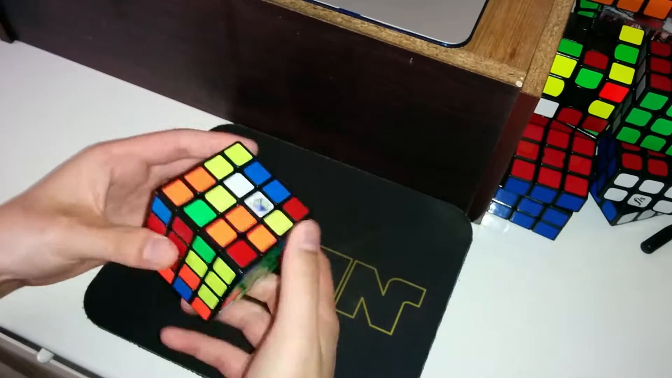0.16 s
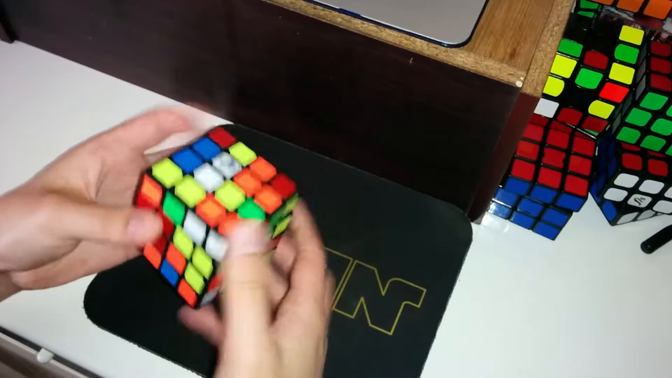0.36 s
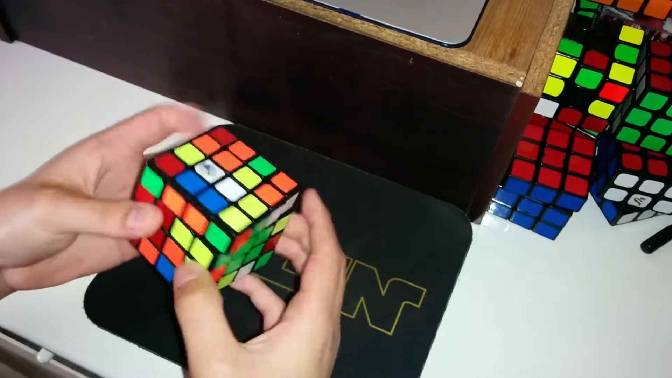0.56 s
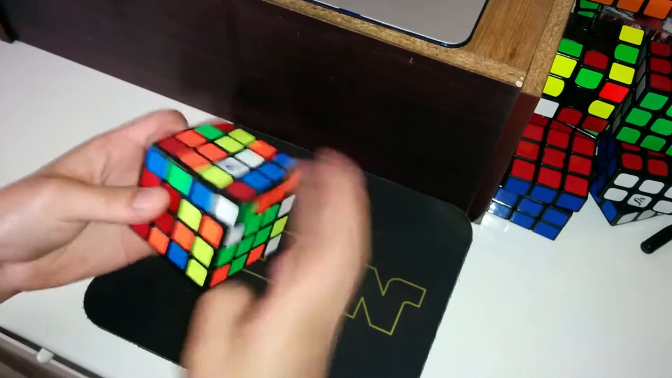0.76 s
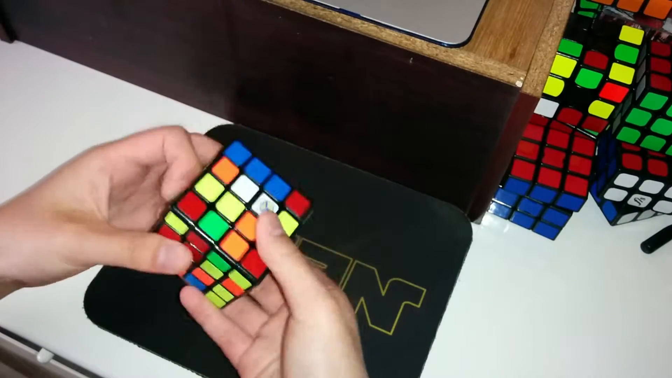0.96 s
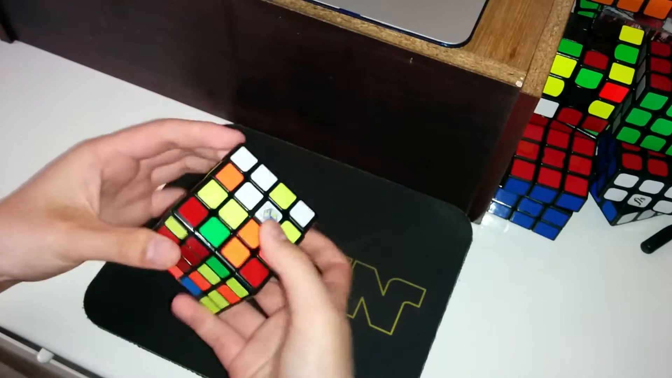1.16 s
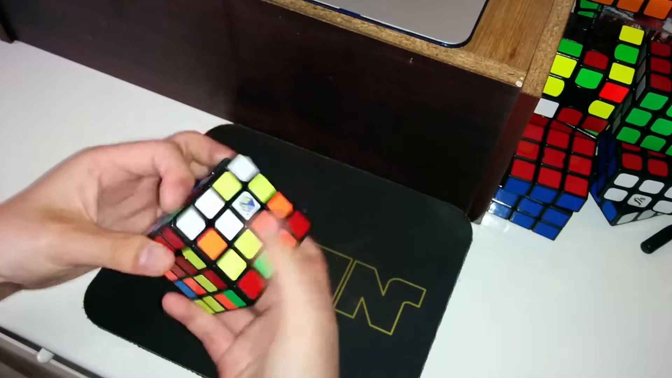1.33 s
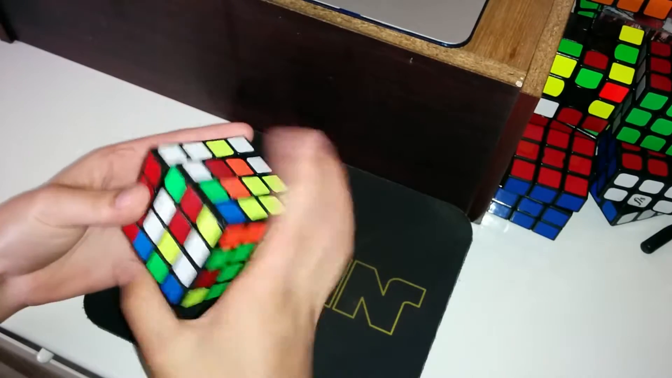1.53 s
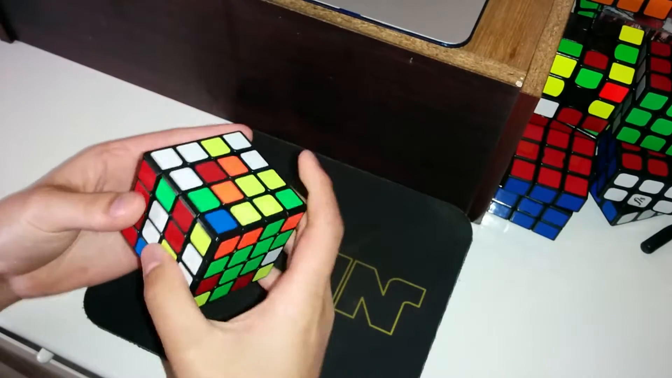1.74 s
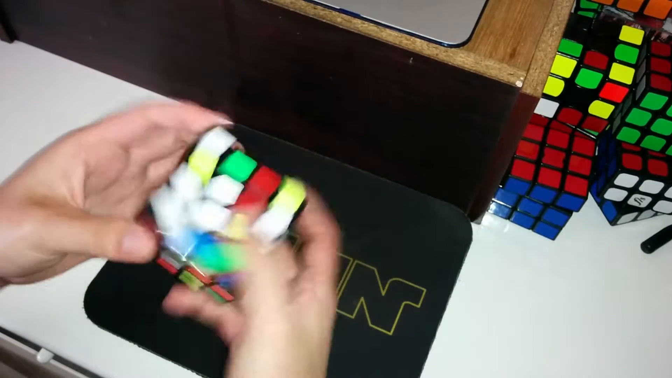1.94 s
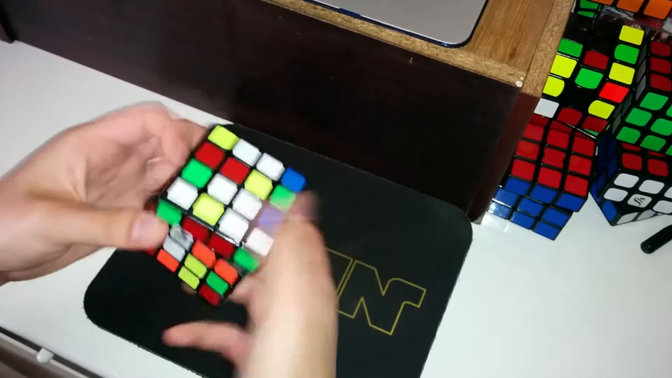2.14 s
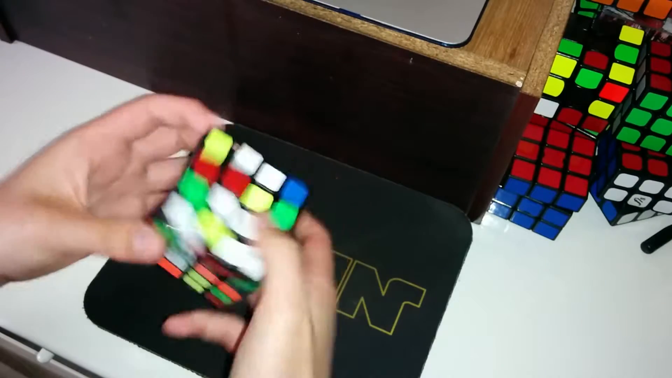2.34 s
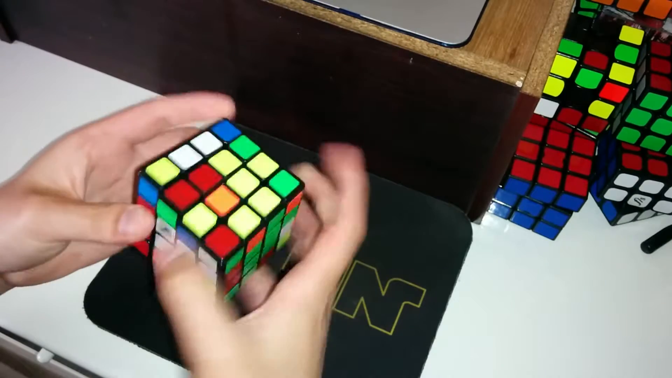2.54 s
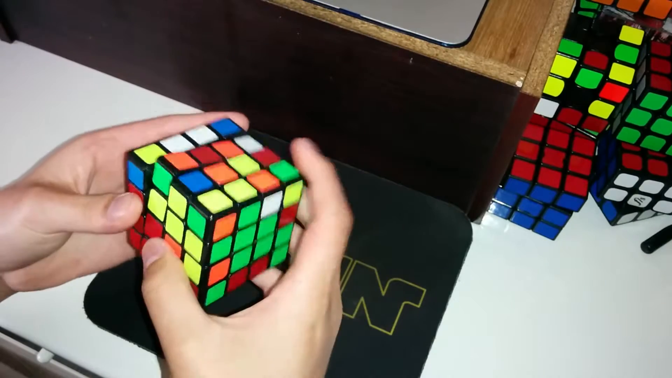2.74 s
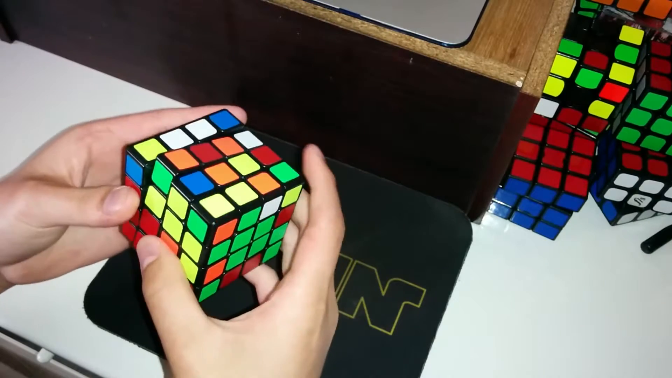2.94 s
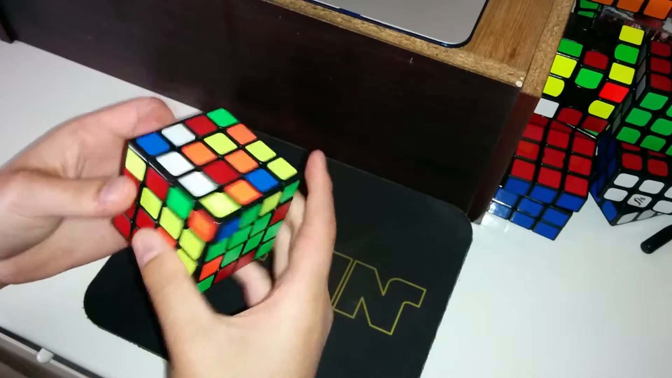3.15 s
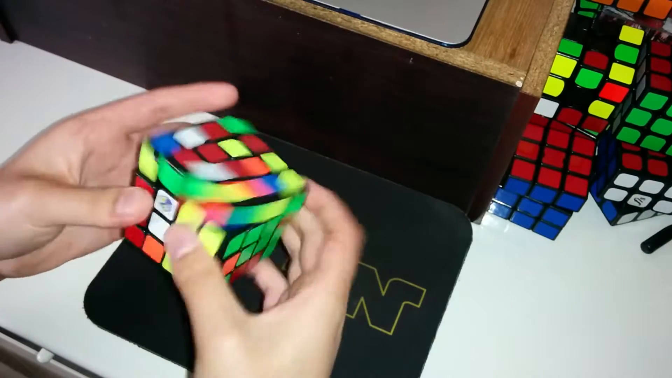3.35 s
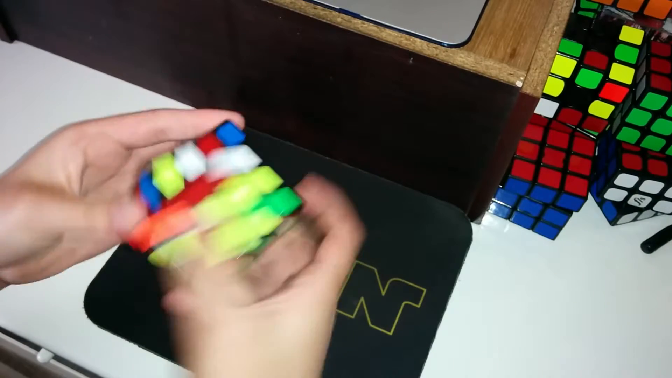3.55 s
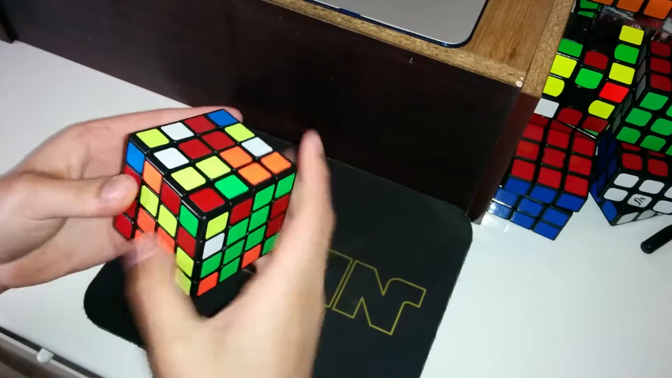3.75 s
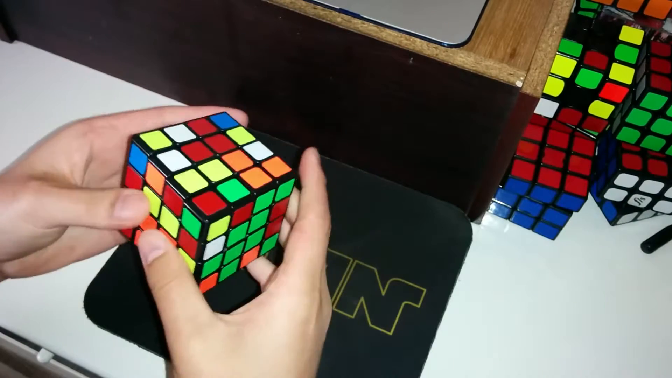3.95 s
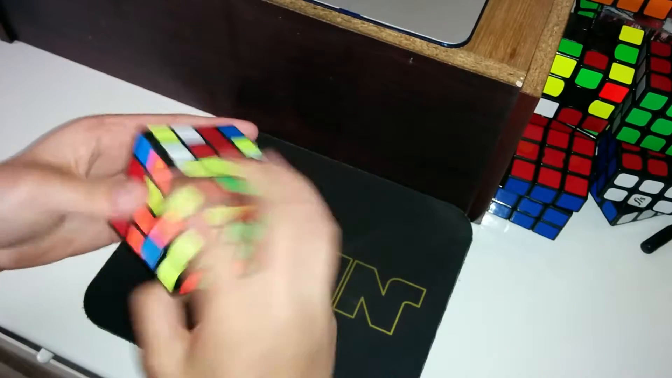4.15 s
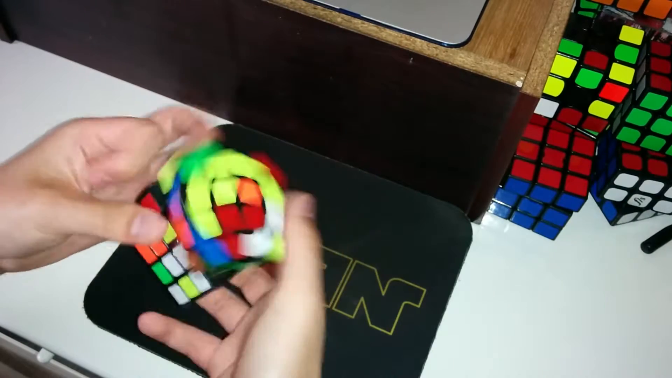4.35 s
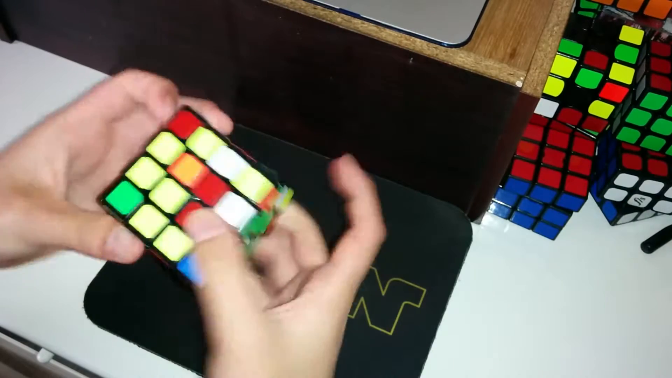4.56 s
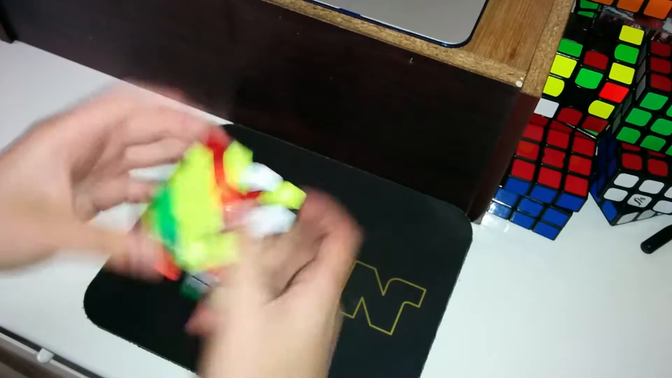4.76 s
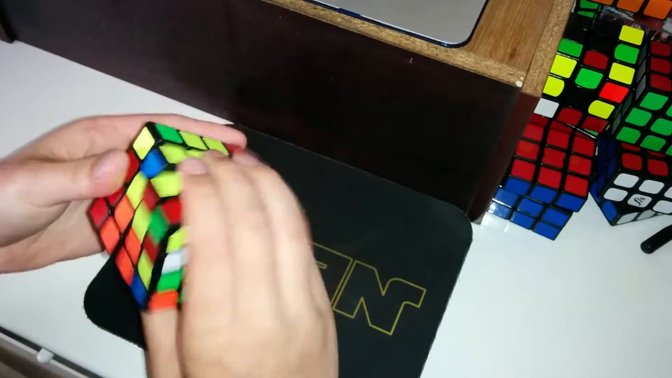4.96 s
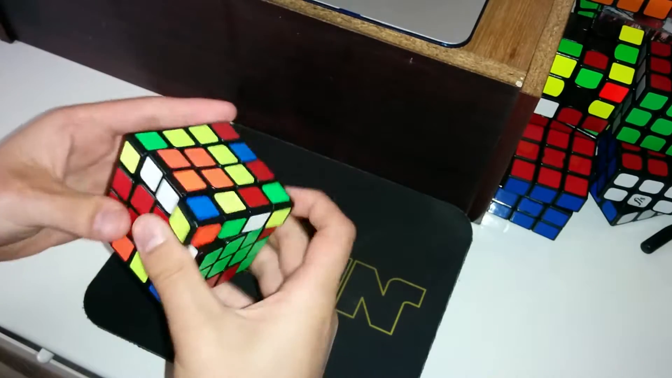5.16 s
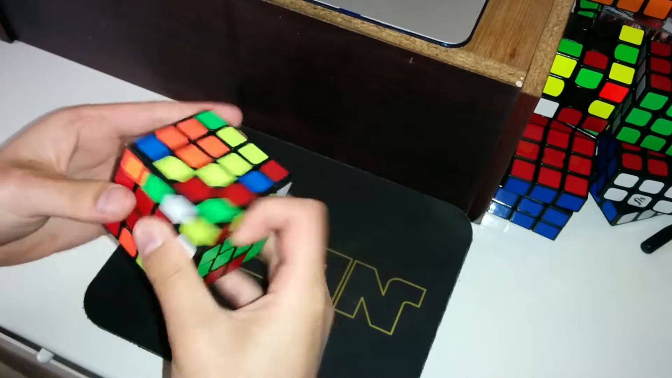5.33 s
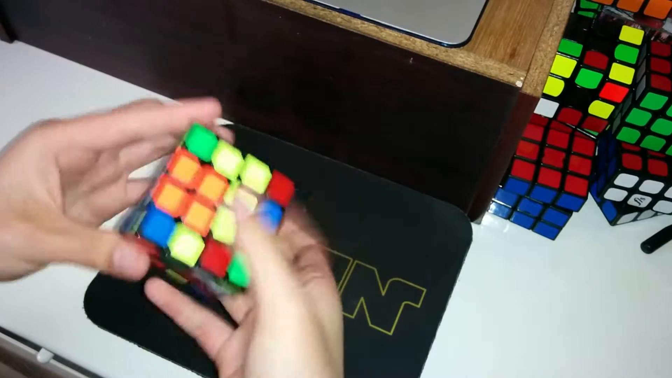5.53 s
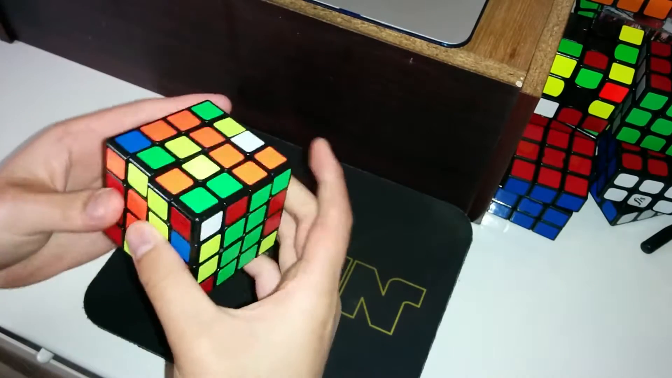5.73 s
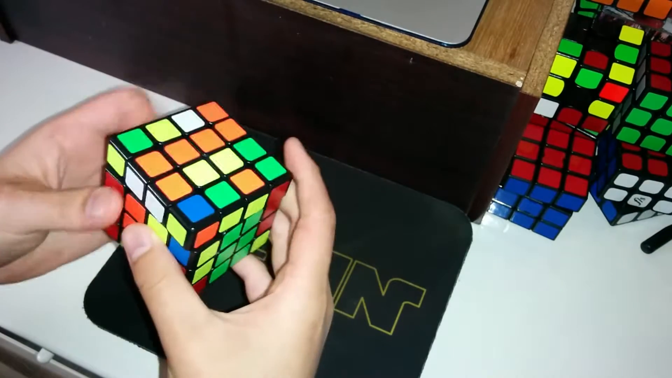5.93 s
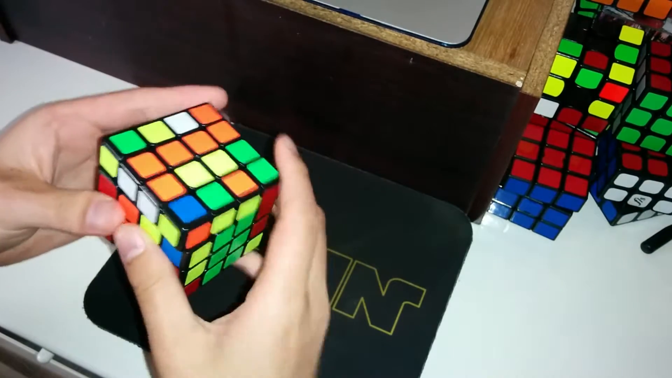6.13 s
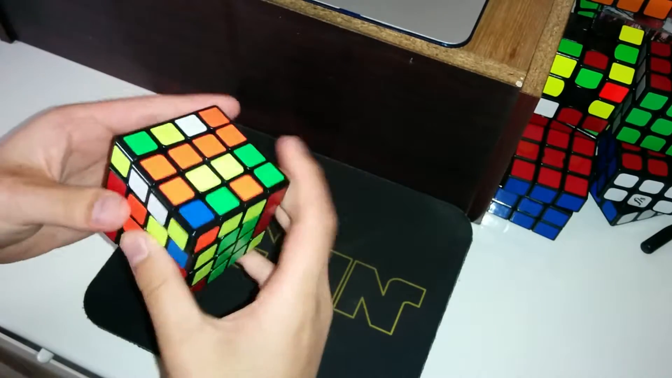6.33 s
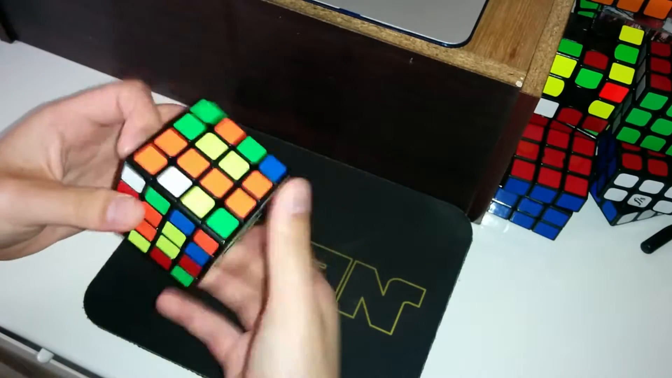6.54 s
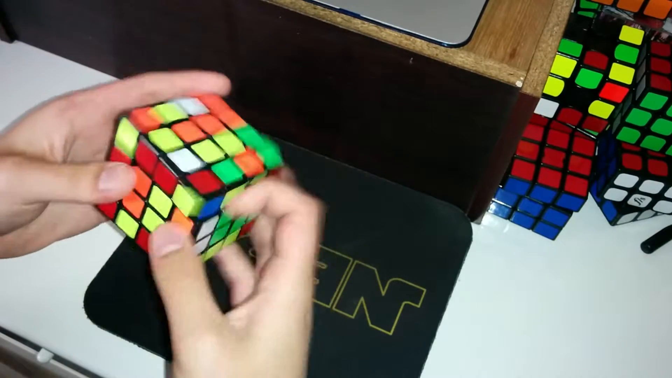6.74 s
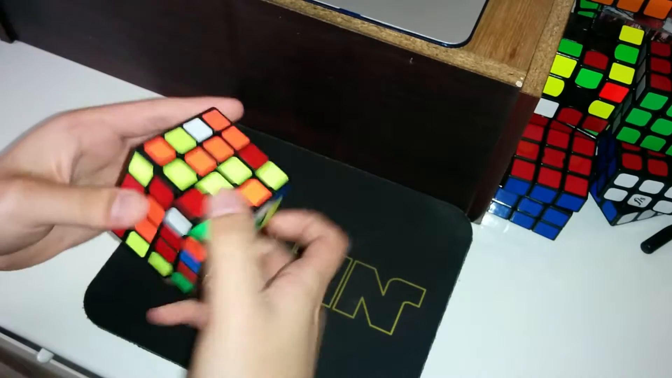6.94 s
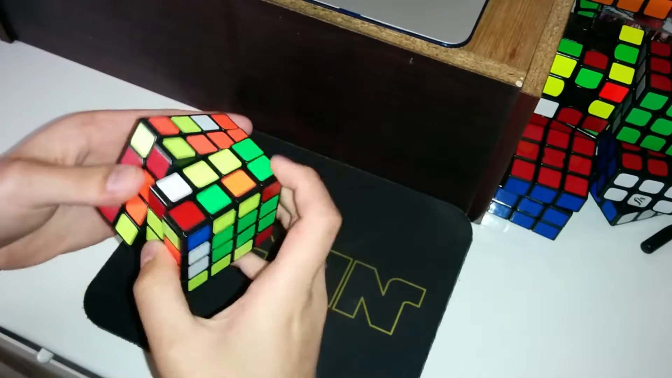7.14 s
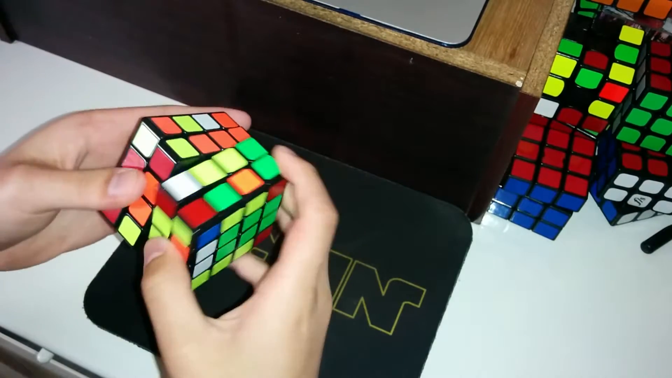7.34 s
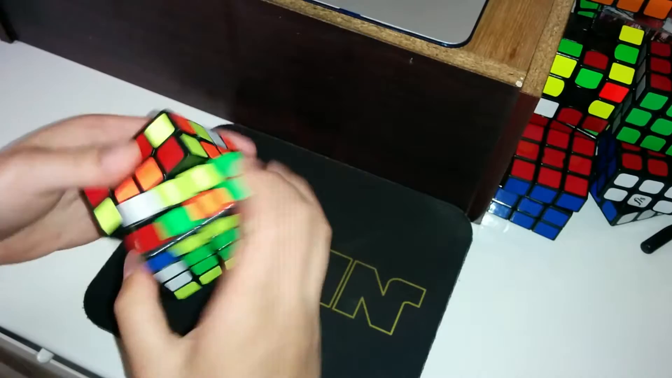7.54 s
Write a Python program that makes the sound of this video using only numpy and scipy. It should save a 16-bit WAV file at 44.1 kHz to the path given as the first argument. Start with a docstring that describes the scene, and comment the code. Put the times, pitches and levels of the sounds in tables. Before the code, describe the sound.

A plastic puzzle cube is turned quickly by hand, close to the microphone in a small, quiet room. Each turn is a brief, chattering scrape ending in a tight cluster of crisp, slightly hollow clacks that die away at once, with tiny ticks around it. The first irregular run lasts from about 0.2 to 1.6 seconds. Another follows from 2.0 to 2.6, then a single click at 2.8 and a dense flurry from 3.2 to 3.7. After a pause, turning resumes at 4.3 and reaches its loudest cluster around 4.9. Sparser, mostly lighter clicks continue until 6.0, with a firmer clack at 5.7. After another short pause, a final burst runs from 6.5 to about 7.1 seconds. The room adds only slight reverberation, and a faint steady hiss and barely audible electrical hum lie underneath throughout.

```python
"""A desk in a small quiet room: a plastic speedcube is turned in quick bursts.
In each turn the pieces scrape and chatter past each other, then clack as they catch and the layer lands.
Every contact rings the hollow body and the thin piece walls. Faint mains hum and room noise lie below;
a noise suppressor cuts the treble tails short."""
import sys
import numpy as np
from scipy import signal
from scipy.fft import rfft, irfft
from scipy.io import wavfile
from scipy.ndimage import uniform_filter1d

SR = 44100
rng = np.random.default_rng(int(sys.argv[2]) if len(sys.argv) > 2 else 0)


def transcribe(signal):
    """Save signal, clipped to [-1, 1], as a 16-bit WAV file at the path in sys.argv[1]."""
    frames = np.atleast_2d(signal).T
    limited = np.clip(frames, -1, 1)
    pcm = np.round(limited * 32767).astype(np.int16)
    wavfile.write(sys.argv[1], SR, pcm)


N = 334719
TIME_S = np.arange(N) / SR
# finger pushes on a layer: start_s, push_s, end_rub_db
TURNS = [(0.174, 0.017, -35), (0.374, 0.044, -36.5), (0.573, 0.012, -30), (0.744, 0.053, -38.5),
         (0.84, 0.033, -30.5), (1.005, 0.025, -32.5), (1.142, 0.021, -42), (1.39, 0.04, -35),
         (1.49, 0.072, -37.5), (2.041, 0.03, -37.5), (2.073, 0.03, -29), (2.262, 0.074, -39.5),
         (2.412, 0.0029, -36.5), (2.477, 0.025, -29.5), (2.576, .022, -33), (2.804, 0.01, -44),
         (3.181, 0.05, -42), (3.292, .066, -41.5), (3.395, 0.044, -35), (3.472, 0.096, -32),
         (3.657, 0.073, -36), (4.299, 0.059, -37), (4.373, 0.054, -29), (4.454, 0.052, -37.5),
         (4.554, 0.0073, -44.5), (4.697, 0.028, -47), (4.857, 0.093, -29.5), (5.104, 0.052, -54),
         (5.331, 0.017, -40), (5.429, .02, -51.5), (5.547, 0.0098, -54.5), (5.71, 0.032, -32.5),
         (5.945, 0.016, -36), (6.573, 0.01, -36.5), (6.637, 0.0038, -45), (6.703, 0.06, -38.5),
         (6.785, 0.033, -36), (6.943, 0.0098, -45.5), (7.089, 0.045, -50)]


def clacks(modes, hollow_db=-2.0, shell_db=-13.5, edge_db=-2.0):
    """Pieces hit each other in a tight cluster as a layer catches or lands."""
    # start_s, level_db, hollow_rel_db, edge_rel_db
    landings = [(0.177, -32, -7, -23), (0.1921, -20, -15.5, -11), (0.395, -16, -21, -15),
                (0.4311, -20, -25, -19), (0.5726, -14.5, -21.5, -19), (0.5841, -16, -19.5, -13),
                (0.6051, -18.5, -26.5, -12.5), (0.7711, -18, -20, -10.5), (0.7869, -14, -21.5, -13.5),
                (0.8295, -21, -18, -11), (0.8425, -17, -21, -9.5), (0.8557, -10, -26.5, -7),
                (0.8728, -13, -28.5, -9), (1.0085, -16.5, -26, -14.5), (1.0217, -11.5, -27, -10.5),
                (1.1135, -31.5, -17.5, -7.5), (1.1444, -20, -28, -12), (1.1611, -17, -22.5, -17),
                (1.3848, -21, -17, -12), (1.4104, -11, -23.5, -16.5), (1.4223, -9.5, -24, -17.5),
                (1.5036, -19.5, -15.5, -14), (1.509, -20, -16, -6), (1.5251, -22.5, -7.5, -26),
                (1.5476, -26.5, -15.5, -12), (1.5834, -19, -19.5, -19), (1.9804, -33.5, -18, -8.5),
                (2.0374, -24.5, -14.5, -21), (2.0829, -8.5, -31, -12.5), (2.105, -12.5, -31, -11.5),
                (2.1564, -28.5, -22, -10), (2.2444, -30, -24, -11), (2.2571, -24.5, -25.5, -10),
                (2.2858, -18.5, -19.5, -16.5), (2.3118, -13.5, -24, -10.5), (2.4105, -23, -27, -13),
                (2.4845, -14, -20.5, -6.5), (2.4904, -24, -22, -16), (2.5234, -30, -25, -11),
                (2.5552, -17, -21.5, -13), (2.5783, -15.5, -30, -15), (2.5922, -16.5, -21, -8.5),
                (2.82, -21, -19, -37), (3.1767, -26, -22, -18), (3.2043, -21.5, -22, -11.5),
                (3.2864, -23.5, -20, -14), (3.3481, -16, -29, -13), (3.3928, -13, -23.5, -24),
                (3.4166, -14, -16.5, -16.5), (3.4304, -18.5, -15, -8), (3.485, -8.5, -24, -11),
                (3.5188, -12.5, -22.5, -10.5), (3.5663, -25, -12, -8.5), (3.6516, -17.5, -22, -14.5),
                (3.6857, -13.5, -20, -17), (3.7004, -9, -23, -16), (3.7304, -22.5, -17.5, -9),
                (4.353, -18, -13, -9.5), (4.3943, -10, -24, -8.5), (4.4104, -17.5, -15, -3),
                (4.4211, -13, -29.5, -5.5), (4.4578, -17.5, -18, -13.5), (4.555, -17.5, -31.5, -12.5),
                (4.6943, -29.5, -26, -11.5), (4.791, -34.5, -23, -5), (4.8596, -16.5, -12.5, -15),
                (4.8775, -5, -21, -15), (4.8923, -15, -19.5, -7.5), (4.9024, -8.5, -17.5, -11),
                (4.9188, -8.5, -24, -9), (4.9339, -16, -11, -15.5), (4.9765, -15.5, -22.5, -20.5),
                (5.099, -33, -20.5, -7), (5.1243, -28.5, -22, -17), (5.1452, -29, -40, -29),
                (5.3379, -21, -17.5, -15.5), (5.426, -32, -35, -3.5), (5.447, -28.5, -33, -11),
                (5.5464, -30, -22, -5.5), (5.5644, -32.5, -40, -8), (5.7009, -24, -28, -13),
                (5.7172, -12.5, -24.5, -11.5), (5.7386, -15.5, -30, -21), (5.9454, -24.5, -21, -18),
                (5.9604, -15.5, -26.5, -13), (6.5455, -31, -26, -13.5), (6.5734, -26.5, -21, -10),
                (6.5876, -19.5, -28, -6.5), (6.7316, -26, -15, -23), (6.7513, -18.5, -21.5, -22),
                (6.7895, -15.5, -22.5, -13.5), (6.7999, -18.5, -21, -12), (6.8183, -16, -23.5, -26),
                (6.9486, -34, -28, 1.5), (7.0862, -33, -8, -10), (7.1171, -22.5, -21, -14.5)]
    # pieces never land quite together: typical_lag_s, gain_db
    contacts = [(-.0018, -13), (.0004, -3), (.002, -6.5)]
    out = np.zeros(N)
    for start_s, level_db, hollow_rel_db, edge_rel_db in landings:
        register_db = level_db + np.array([hollow_db + hollow_rel_db, shell_db, edge_db + edge_rel_db])
        colour = piece_colour()
        for lag_s, gain_db in contacts:
            ring = strike(modes, register_db + gain_db, colour)
            add(out, ring, start_s + lag_s * (.5 + rng.random()))
    return out


def chatter(modes, ticks_per_s=1100, spread_db=6.5, hollow_db=-9.5, edge_db=-0.5, stick_db=-62, pieces=9):
    """A sliding layer sets loose pieces ticking against their neighbours, each with its own ring."""
    rub_db = rubbing_db()
    sticking_db = 2 * np.minimum(rub_db - stick_db, 0)   # friction holds under the lightest push
    effort = from_db(rub_db + sticking_db)
    hits = rng.random(N) < ticks_per_s / SR
    ticks = hits * from_db(spread_db * rng.standard_normal(N)) * rng.choice([-1, 1], N)
    # fingers supply steady power, however it splits among the ticks
    tick_power = np.abs(uniform_filter1d(ticks ** 2, size=500))
    ticks = effort * ticks / np.sqrt(tick_power + 1e-6)
    piece = rng.integers(0, pieces, N)
    out = np.zeros(N)
    for k in range(pieces):
        ring = strike(modes, [hollow_db, 0, edge_db], piece_colour())
        out += signal.oaconvolve(ticks * (piece == k), ring / np.linalg.norm(ring))[:N]
    return out


def rubbing_db(hold_db=-69.0, grip_db_per_s=1298.5, swell_db_per_s=49.5, run_out_db_per_s=485):
    """Rubbing between layers: each turn grips quickly, gathers force while pushed, then runs out."""
    out = np.full(N, hold_db)
    for start_s, push_s, end_rub_db in TURNS:
        left_s = start_s + push_s - TIME_S
        to_rise_db = grip_db_per_s * np.maximum(start_s - TIME_S, 0) + swell_db_per_s * left_s
        below_end_db = np.where(left_s > 0, to_rise_db, -run_out_db_per_s * left_s)
        out = np.maximum(out, end_rub_db - below_end_db)
    return out


def nudges(modes, shell_db=-59, spread_db=3.5, before_s=.05, after_s=0.082, per_turn=3):
    """Fingers shifting their grip around each turn nudge single pieces into light ticks."""
    register_rel_db = np.array([-10.0, 0, 2.0])   # hollow, shell, edge
    out = np.zeros(N)
    for start_s, push_s, _ in TURNS:
        for tick_s in rng.uniform(start_s - before_s, start_s + push_s + after_s, per_turn):
            level_db = shell_db + spread_db * rng.standard_normal()
            add(out, strike(modes, level_db + register_rel_db, piece_colour()), tick_s)
    return out


def cube_modes(wall_t60_s=0.027, wall_count=340, snap_db=9.0, snap_s=0.00067, splits_hz=(2250, 7000)):
    """Decaying body and wall modes as (hz, rings) in three rising registers: hollow, shell, edge."""
    # resonances of the whole hollow cube: pitch_hz, level_db, t60_s
    body = [(961, -1.5, 0.054), (1237, 4, 0.049), (1244, 7.5, 0.076), (1528, -3.5, 0.064),
            (1656, -2, 0.051), (1910, 0.5, 0.008), (2980, -3, 0.022), (4060, 3, 0.061), (4960, 4.5, 0.029),
            (5500, 2.5, 0.013), (6220, 7, 0.023), (9680, -1.5, 0.018)]
    # strength of the short modes of the thin walls: pitch_hz, level_db
    wall_spectrum = [(450, -10.5), (780, -11), (1200, 3.5), (1800, 4), (2250, -3.5), (3000, 0.5), (4500, 6),
                     (7000, -1.5), (9500, 1), (12000, -3), (16000, -12.5)]
    t = np.arange(SR // 20) / SR
    wall_hz = np.linspace(400, 16000, wall_count) + rng.uniform(-20, 20, wall_count)
    wall_decays_s = wall_t60_s * rng.uniform(.7, 1.3, wall_count)
    walls = np.column_stack([wall_hz, at_hz(wall_spectrum, wall_hz), wall_decays_s])
    hz, level_db, t60_s = np.vstack([body, walls]).T
    envelopes = from_db(level_db[:, None] - 60 * t / t60_s[:, None])
    rings = envelopes * np.cos(2 * np.pi * np.outer(hz, t))
    register = np.digitize(hz, splits_hz)
    rings[register == 2] *= from_db(snap_db * np.exp(-t / snap_s))   # hard edges snap at first touch
    return [(hz[register == k], rings[register == k]) for k in np.unique(register)]


def strike(modes, register_db, colour):
    """One contact shares its energy randomly among the modes; register_db holds for the first 4 ms."""
    out = 0
    for (hz, rings), level_db in zip(modes, register_db):
        weights = rng.standard_normal(len(hz)) * from_db(at_hz(colour, hz))
        ring = weights @ rings
        out = out + from_db(level_db) * ring / np.std(ring[:SR // 250])
    return out


def piece_colour(spread_db=2.6):
    """Each piece favours its own pitch regions: pitch_hz, gain_db."""
    hz = np.geomspace(400, 17000, num=26)
    return np.column_stack([hz, rng.normal(0, spread_db, len(hz))])


def radiate(x, low_hz=380):
    """A fist-sized body radiates hardly any bass."""
    return signal.sosfilt(butter_sos(3, low_hz, "high"), x)


def room(x, wet_db=-15.0, first_reflection_s=0.0027):
    """Diffuse tail, dying at its own rate in each octave."""
    # band_hz, t60_s
    decay_times = [(300, 1), (1200, 0.23), (4000, 0.19), (9000, 0.34), (16000, 0.14)]
    t = np.arange(SR // 2) / SR
    edges_hz = np.geomspace(250, 17000, num=7)
    tail = 0
    for low, high in zip(edges_hz, edges_hz[1:]):
        band = signal.sosfilt(butter_sos(2, [low, high], "band"), rng.standard_normal(len(t)))
        t60_s = at_hz(decay_times, np.sqrt(low * high))
        tail = tail + band * from_db(-60 * t / t60_s)
    tail *= np.clip(t / first_reflection_s - 1, 0, 1)
    response = from_db(wet_db) * tail / np.linalg.norm(tail)
    return signal.oaconvolve(x, response)[:N]


def room_noise(level_db=-67.0, warble_db=2.2, steps_per_s=16):
    """Steady room and microphone noise, its low bands mottled by noise-suppressor warble."""
    # band_hz, relative_density_db
    spectrum = [(30, -4), (90, -7.5), (160, -10), (280, -18), (400, -4), (520, 3.5), (680, -5), (850, -1),
                (1200, -7), (1800, -8.5), (3400, -4), (5000, -11.5), (9000, -18.5), (16000, -24)]
    gains = from_db(at_hz(spectrum, np.fft.rfftfreq(N, 1 / SR)))
    air = irfft(rfft(rng.standard_normal(N)) * gains, N)
    air /= np.sqrt(np.mean(air ** 2))
    edges_hz = np.geomspace(350, 1400, num=6)
    for low, high in zip(edges_hz, edges_hz[1:]):
        band = signal.sosfiltfilt(butter_sos(2, [low, high], "band"), air)
        steps_db = rng.normal(0, warble_db, size=1000)
        gain_db = np.interp(TIME_S * steps_per_s, np.arange(len(steps_db)), steps_db)
        air += band * (from_db(gain_db) - 1)
    return from_db(level_db) * air


def mains_hum():
    """Steady harmonics of a mains appliance."""
    # pitch_hz, rms_db
    harmonics = [(100, -86.5), (200, -83.5), (300, -87), (400, -81.5), (600, -84)]
    return sum(np.sqrt(2) * from_db(rms_db) * np.sin(2 * np.pi * (hz * TIME_S + rng.random()))
               for hz, rms_db in harmonics)


def noise_suppressor(x, knee_db=10.0, window_s=0.018):
    """Turns each treble band down while its level is under a threshold."""
    # low_edge_hz, threshold_db, max_cut_db
    bands = [(1036, -59, 8.5), (3083, -50.5, 11.5), (7500, -45.5, 2.5)]
    out, rest = 0, x
    for low_edge_hz, threshold_db, max_cut_db in reversed(bands):
        band = signal.sosfiltfilt(butter_sos(4, low_edge_hz, "high"), rest)
        rest = rest - band
        power = np.abs(uniform_filter1d(band ** 2, int(window_s * SR)))
        level_db = 10 * np.log10(power + 1e-14)
        closed = np.clip((threshold_db - level_db) / knee_db, 0, 1)
        out = out + band * from_db(-max_cut_db * closed)
    return out + rest


def from_db(db):
    """Decibels to gain."""
    return 10 ** (np.asarray(db) / 20)


def at_hz(points, hz):
    """Interpolate a table on a log-frequency axis."""
    known_hz, values = np.transpose(points)
    return np.interp(np.log(np.maximum(hz, 1)), np.log(known_hz), values)


def butter_sos(order, hz, kind):
    """Butterworth filter sections."""
    return signal.butter(order, hz, kind, fs=SR, output="sos")


def add(track, sound, start_s):
    """Mix a sound into the track."""
    start = max(round(start_s * SR), 0)
    track[start:start + len(sound)] += sound[:N - start]


def scene():
    """The cube close up, over room noise and hum; mono."""
    modes = cube_modes()
    cube = radiate(clacks(modes) + chatter(modes) + nudges(modes))
    return (cube + room(cube) + room_noise() + mains_hum())[None]


def record(dry):
    """Noise suppression, then a steep low-pass."""
    cutoff_hz = 16050
    low_pass = signal.ellip(12, rp=.1, rs=75, Wn=cutoff_hz, fs=SR, output="sos")
    return signal.sosfilt(low_pass, noise_suppressor(dry))


dry = scene()
out = record(dry)
transcribe(out)
```